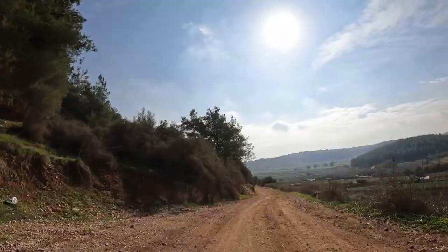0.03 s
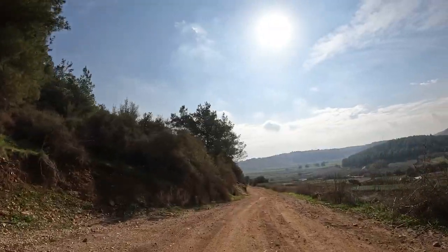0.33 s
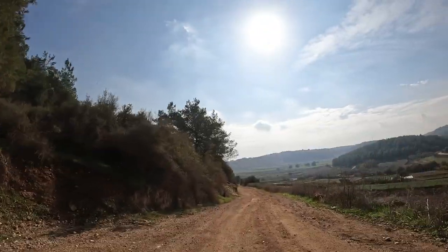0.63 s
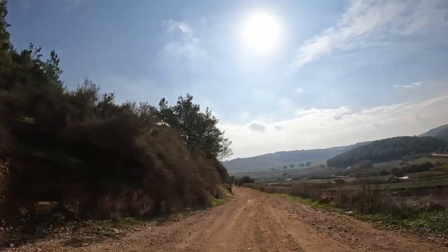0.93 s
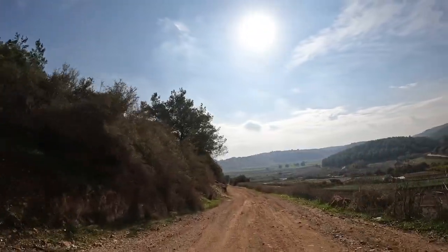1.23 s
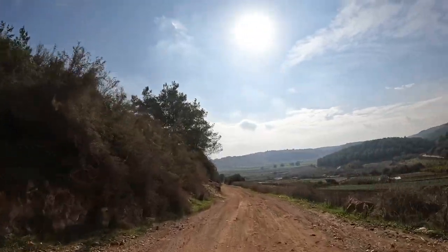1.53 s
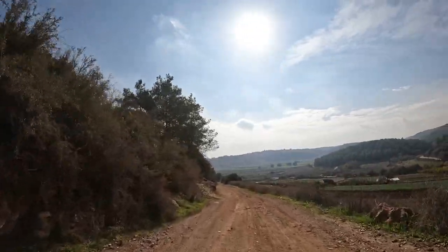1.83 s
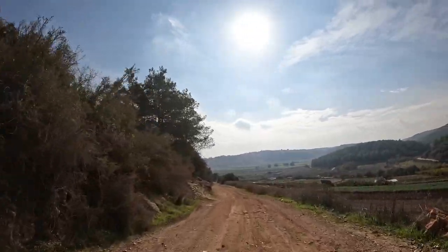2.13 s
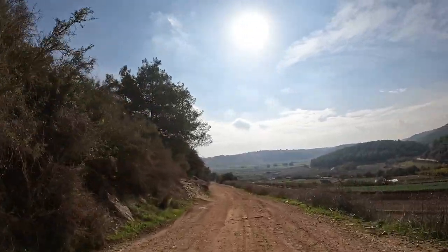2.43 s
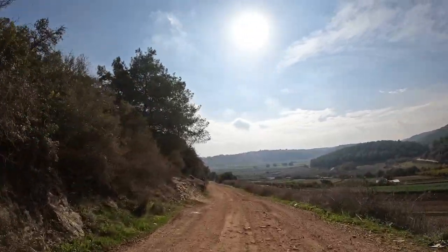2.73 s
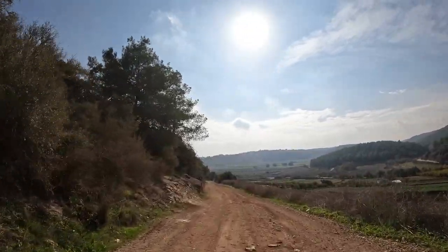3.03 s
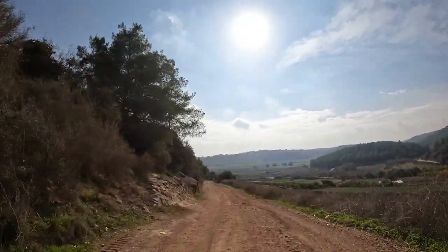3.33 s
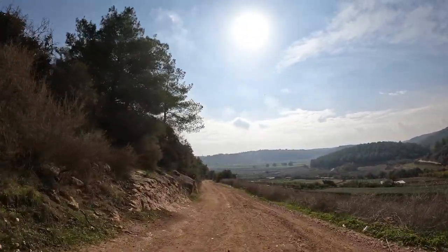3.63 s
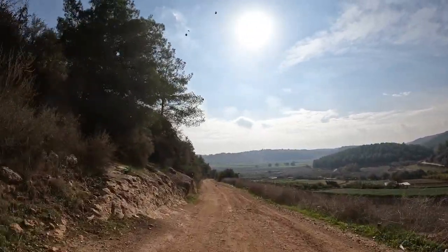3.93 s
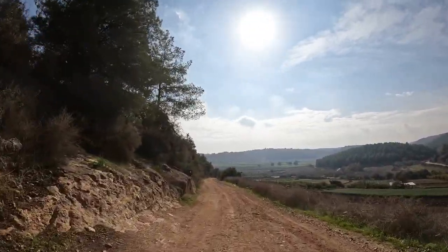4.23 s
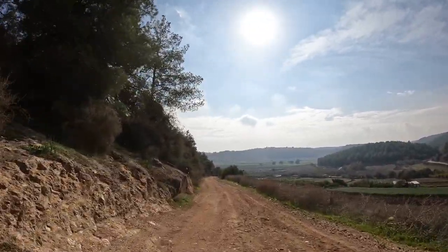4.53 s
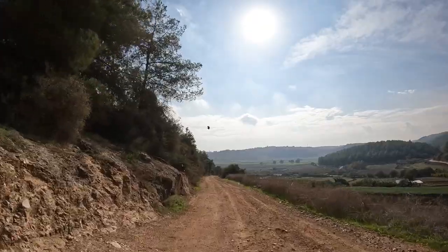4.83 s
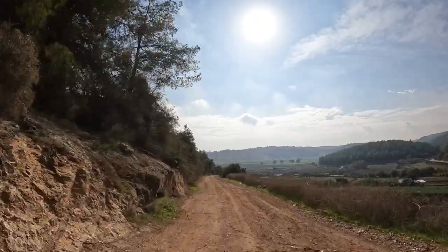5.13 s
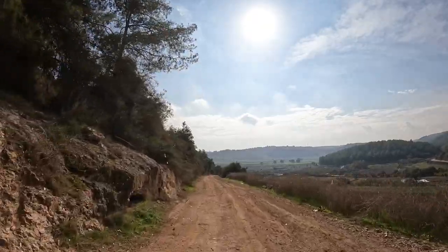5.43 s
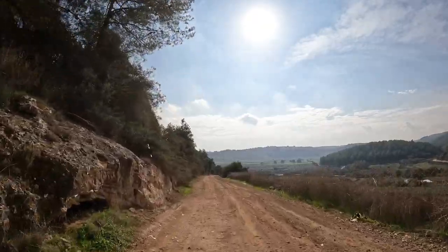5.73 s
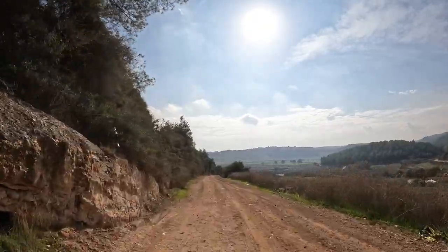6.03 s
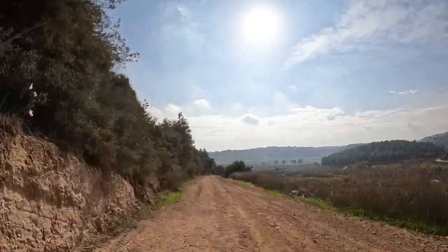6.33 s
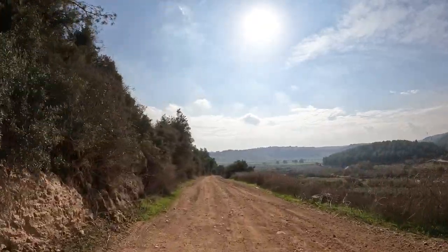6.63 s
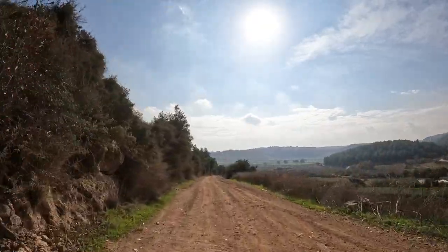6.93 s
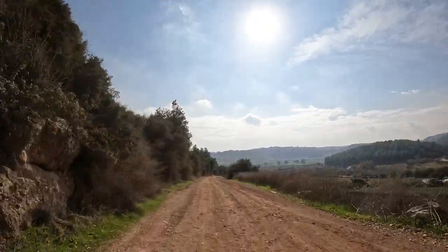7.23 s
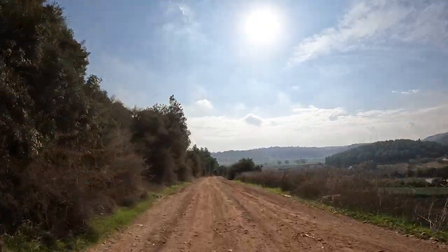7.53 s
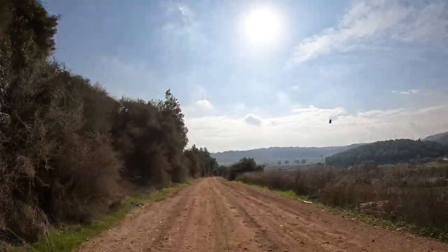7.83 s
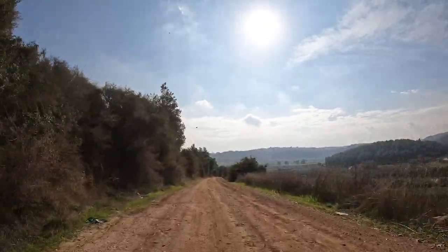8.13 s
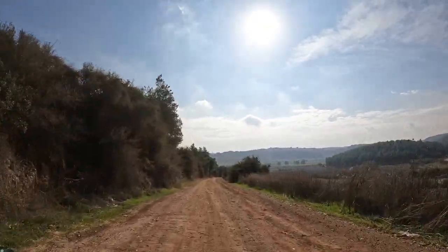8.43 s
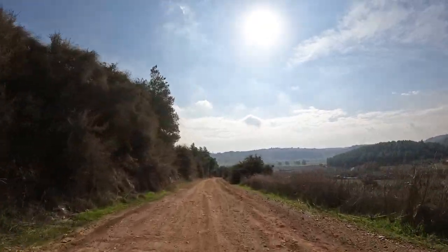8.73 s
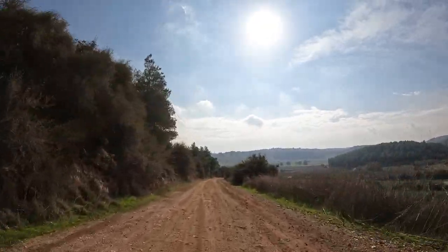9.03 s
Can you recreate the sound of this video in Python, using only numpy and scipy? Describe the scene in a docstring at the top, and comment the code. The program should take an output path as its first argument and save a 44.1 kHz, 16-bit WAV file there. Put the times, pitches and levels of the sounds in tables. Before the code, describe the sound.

Riding over loose gravel in the open, with the microphone mounted on the vehicle and no echo. Steady low rumble and shuddering vibration carry on throughout, with gritty tyre noise and snapping pebbles. Scattered thumps and a couple of faint metal pings come first. Then a dense plastic rattle and heavier knocks build through the middle, thinning into separate clacks and bumps as the ride continues.

```python
"""Riding a stony dirt track

A light vehicle is heard from a small camera fixed to it. Air and road drive the frame into forced
vibration, and the tyres crunch and slip on grit. Impacts excite damped modes: ruts thud the suspension,
bumps thump the frame, and the camera mount clacks against its stop and chatters on rough ground.
Loose stones tick away from the wheels; now and then one rings a thin metal part."""
import sys
import numpy as np
from scipy import signal
from scipy.fft import rfft, irfft
from scipy.io import wavfile
from scipy.ndimage import uniform_filter1d, minimum_filter1d

SR = 44100
rng = np.random.default_rng(int(sys.argv[2]) if len(sys.argv) > 2 else 0)


def dump(signal):
    """Clip the signal to [-1, 1] and save it as 16-bit WAV at the path in sys.argv[1]."""
    limited = np.clip(np.atleast_2d(signal).T, -1, 1)
    pcm = np.round(limited * 32767).astype(np.int16)
    wavfile.write(sys.argv[1], SR, pcm)


N = 404838
TIME = np.arange(N) / SR
HIT_TIME = TIME[:8192]  # time axis of one impact
LEAD_S = .04  # run-up before a contact


def undb(db):
    """Amplitude ratio of a level in decibels."""
    return 10 ** (np.asarray(db) / 20)

def unit(x):
    """Normalisation to an rms of 1."""
    return x / np.sqrt(np.mean(x ** 2))

def curves(table):
    """Linear interpolation of a timed table's columns at every sample."""
    s, *columns = np.transpose(table)
    return [np.interp(TIME, s, column) for column in columns]

def colour(x, points):
    """Spectral shaping through (Hz, dB) points, falling 30 dB per octave beyond both ends."""
    hz, db = np.transpose(points)
    octave = np.log2(np.maximum(np.arange(len(x) // 2 + 1) * SR / len(x), 1))
    beyond = np.abs(octave - np.clip(octave, np.log2(hz[0]), np.log2(hz[-1])))
    gain = undb(np.interp(octave, np.log2(hz), db) - 30 * beyond)
    return irfft(rfft(x) * gain, len(x))

def fade(t60, t=HIT_TIME):
    """Exponential decay by 60 dB in t60 seconds."""
    return np.exp(-np.log(1000) * t / t60)

def add(track, s, sound):
    """Superposition of a sound on a track at s seconds."""
    i = max(int(s * SR), 0)
    track[i:i + len(sound)] += sound[:max(N - i, 0)]

def ring(modes, spread, scatter_db):
    """Modal impulse response of peak 1; pitch and share vary with the point of contact."""
    response = 0
    for hz, db, t60 in modes:
        detune, share = rng.standard_normal(2)
        tone = np.sin(2 * np.pi * hz * (1 + spread * detune) * HIT_TIME)
        response = response + undb(db + scatter_db * share) * fade(t60) * tone
    return response / np.abs(response).max()

def thud(modes, push_s):
    """A gradual push excites the modes without a click."""
    return (1 - np.exp(-(HIT_TIME / push_s) ** 2)) * ring(modes, spread=.05, scatter_db=3)

def grains(per_s, spread_db):
    """Shot noise: random impacts, many small and a few large."""
    size = undb(spread_db * np.minimum(rng.exponential(size=N), 4))
    return unit((rng.random(N) < per_s / SR) * size * rng.standard_normal(N))

def flicker(length, depth_db, span):
    """Log-normal amplitude modulation, smoothed over span samples."""
    return undb(depth_db * unit(uniform_filter1d(rng.standard_normal(length), span)))

def burst(rise_s, t60, tail_db, tail_t60):
    """Transient noise that grows until LEAD_S, then decays with a weak tail."""
    after = np.maximum(HIT_TIME - LEAD_S, 0)
    rise = np.exp(np.minimum(HIT_TIME - LEAD_S, 0) / rise_s)
    decay = fade(t60, after) + undb(tail_db) * fade(tail_t60, after)
    return rise * decay * rng.standard_normal(len(HIT_TIME))

def steady(x, span_s, share):
    """Envelope compression evens out a share of a vibration's slow swells."""
    power = uniform_filter1d(x ** 2, int(span_s * SR))
    return unit(x / (power + 1e-9) ** (share / 2))


# Spectrum of the rumble. Each row: frequency in Hz, relative density in dB.
RUMBLE_SPECTRUM = [(14, -9), (21, -1), (30, 0), (43, -.5), (60, -6.5), (85, -10), (130, -22)]

def rumble():
    """Random forcing by air and suspension gives a deep noise; its slow swells are partly evened out."""
    noise = colour(rng.standard_normal(N), RUMBLE_SPECTRUM)
    return undb(-18.5) * steady(noise, span_s=0.06, share=0.5)

# Stony stretches of track. Each row: start in seconds, length in seconds.
STONY_STRETCHES = [(3.628, 0.12), (4.83, 0.064), (5.117, 0.16), (5.418, 0.14), (5.867, 0.059),
                   (6.403, 0.14), (6.62, 0.17), (7.103, 0.08), (7.515, 0.1), (8.241, 0.084)]

def stony():
    """A soft-edged gate: 1 on a stony stretch, 0 elsewhere."""
    inside = sum(np.clip((TIME - s) / .01, 0, 1) * np.clip((s + length_s - TIME) / .01, 0, 1)
                 for s, length_s in STONY_STRETCHES)
    return uniform_filter1d(inside, size=1200)

# How hard the ground shakes the vehicle. Each row: time in seconds, relative level in dB.
GROUND_SHAKE = [(0.0, -37), (0.3, -37.5), (1.48, -34.5), (1.84, -36), (3.4, -33.5), (3.81, -33),
                (4.24, -36.5), (4.88, -31.5), (5.01, -31.5), (5.67, -30.5), (6.26, -33.5), (6.62, -35),
                (6.77, -32.5), (9.18, -33)]

def shaking_db():
    """Base excitation follows the ground's roughness and rises on stony stretches."""
    return curves(GROUND_SHAKE)[0] + 4.5 * stony()

# Spectrum of the drumming frame. Each row: frequency in Hz, relative density in dB.
DRUMMING_SPECTRUM = [(140, -28.5), (230, 2), (310, 0), (400, 0.5), (470, -8.5), (560, -15.5), (700, -23.5),
                     (810, -19.5), (1000, -32), (1500, -37)]

def drumming():
    """Forced vibration: dense small bumps are filtered by the frame's response."""
    response = colour(grains(per_s=1300, spread_db=2), DRUMMING_SPECTRUM)
    return steady(response, span_s=0.38, share=0.089) * undb(shaking_db() + 0.5)

# The suspension heaves over dips. Each row: start in seconds, length in seconds, shudder change in dB.
DIP_HEAVES = [(0.087, 0.21, 5), (0.501, 0.17, 11.5), (0.727, 0.11, 11), (1.04, 0.45, 5.5),
              (2.68, .16, -1.5), (3.08, 0.22, 2.5), (3.76, 0.2, 1), (4.853, 0.48, 3), (5.45, 0.17, 7.5),
              (7.35, 0.35, 4), (8.26, 0.38, 6.5)]
# Spectrum of the shuddering frame. Each row: frequency in Hz, relative density in dB.
SHUDDER_SPECTRUM = [(55, -28), (85, -9), (115, 2.5), (155, -6), (205, -6), (270, -33), (400, -52.5)]

def shudder():
    """Low frame vibration, amplitude-modulated by rough ground, heaves and random surges."""
    level_db = -31.5 + 0.47 * (shaking_db() + 36)  # -36 dB is the usual shaking
    for s, length_s, db in DIP_HEAVES:
        add(level_db, s, db * np.hanning(int(length_s * SR)))
    surge_db = 1.7 * unit(colour(rng.standard_normal(N), [(3, 0), (9, 0)]))
    noise = colour(rng.standard_normal(N), SHUDDER_SPECTRUM)
    return steady(noise, span_s=0.64, share=0.15) * undb(level_db + surge_db)

def grit_noise(spectrum, patchy_db, span):
    """Granular friction: neighbouring grains slip together in clusters about span samples long."""
    clusters = flicker(N, patchy_db, span)
    grit = unit(grains(per_s=5000, spread_db=1.5) + 1.9 * rng.standard_normal(N))
    return unit(colour(grit * clusters, spectrum))

# Loose cover on the track. Each row: time in seconds, relative crunch and sand levels in dB.
LOOSE_COVER = [(0.0, -46.5, -65), (0.54, -53, -68.5), (0.74, -49, -61), (1.76, -51, -63.5),
               (1.94, -54.5, -66), (2.48, -54, -65.5), (2.71, -51, -59.5), (3.35, -50, -63),
               (3.81, -47.5, -57.5), (4.01, -52.5, -64.5), (4.19, -52, -67.5), (4.91, -47.5, -57),
               (5.03, -50.5, -59), (5.78, -47.5, -58), (6.14, -48, -59.5), (6.59, -53.5, -61.5),
               (6.88, -51, -66), (7.31, -50.5, -59.5), (7.8, -48.5, -60.5), (8.05, -48.5, -58.5),
               (8.36, -46, -56.5), (8.59, -51, -64), (8.7, -54.5, -65), (8.85, -47.5, -62),
               (9.18, -52.5, -59.5)]
# Spectra of crushed grit and of fine sand. Each row: frequency in Hz, relative density in dB.
CRUNCH_SPECTRUM = [(400, 13), (800, 11), (1200, 8), (1450, 5.5), (1700, 5), (2150, -1.5), (2900, -1),
                   (3700, -4), (5000, -18)]
SAND_SPECTRUM = [(2000, -14.5), (3600, -6.5), (5000, 0.5), (6300, -3.5), (6900, -14.5), (8200, -14),
                 (9200, -22), (11000, -17.5), (13500, -45.5)]

def tyres():
    """Countless tiny contacts under the tread sum to a soft crunch and a hiss of sand."""
    crunch_db, sand_db = curves(LOOSE_COVER)
    crunch = grit_noise(CRUNCH_SPECTRUM, patchy_db=3, span=900) * undb(crunch_db + 2.1)
    sand = grit_noise(SAND_SPECTRUM, patchy_db=-0.5, span=2600) * undb(sand_db - 3.2)
    return (crunch + sand) * undb(5 * stony())

# Spectrum of cracking chips. Each row: frequency in Hz, relative density in dB.
CHIP_SPECTRUM = [(800, -6), (1500, 1.5), (2700, 5), (3600, -9.5), (5500, -11), (7000, -23)]

def chips():
    """Brittle fracture: single chips crack under the tread, louder where the cover is loose."""
    fractures = grains(per_s=70, spread_db=2)
    crack = fade(.014) * rng.standard_normal(len(HIT_TIME))
    cracks = signal.fftconvolve(fractures, crack)[:N]
    return unit(colour(cracks, CHIP_SPECTRUM)) * undb(curves(LOOSE_COVER)[0] - 12.5)

# A tyre slips on grit. Each row: start in seconds, length in seconds, level at the crest in dB,
# centre frequency in Hz, half-width in octaves.
TYRE_SLIPS = [(0, 0.45, -50.5, 1110, 0.83), (0.047, 0.031, -47, 3530, 0.33),
              (0.157, 0.011, -41, 2350, 0.37), (0.305, 0.013, -46, 1990, 0.44),
              (0.498, 0.25, -47, 1660, 1.65), (0.573, 0.046, -46, 2300, 0.72),
              (0.657, 0.28, -51.5, 2200, 1.4), (2.475, 0.29, -48.5, 1560, 0.42),
              (2.509, 0.011, -44, 2040, 0.44), (3.184, 0.026, -45.5, 2810, 0.93),
              (4.478, 0.31, -54, 1570, 0.3)]

def slips():
    """Sliding friction rubs a swelling band of noise out of the grit."""
    out = np.zeros(N)
    for s, length_s, db, hz, octaves in TYRE_SLIPS:
        swell = np.hanning(int(length_s * SR))
        band = [(hz / 2 ** octaves, -15), (hz, 0), (hz * 2 ** octaves, -15)]
        rub = unit(colour(rng.standard_normal(len(swell)), band))
        add(out, s, undb(db) * rub * swell)
    return out

# A wheel drops into a rut. Each row: start in seconds, relative level in dB.
RUT_DROPS = [(0.108, -20), (0.188, -21), (0.562, -15), (1.087, -19), (1.159, -12), (1.269, -25),
             (1.485, -15), (2.144, -13.5), (3.143, -20), (3.299, -16.5), (3.399, -21), (3.563, -16.5),
             (4.822, -21), (5.07, -14), (5.281, -13.5), (6.077, -12.5), (6.401, -13), (6.565, -8),
             (7.109, -15), (7.397, -24), (7.542, -16.5), (7.894, -17), (8.463, -16.5)]
# Modes of the suspension. Each row: frequency in Hz, relative level in dB, t60 in seconds.
SUSPENSION_MODES = [(96.3, -7.5, 0.14), (120, -1.5, 0.1), (148.6, -10.5, 0.064)]

def ruts():
    """Damped free vibration of the suspension gives a soft, deep thud at each rut."""
    out = np.zeros(N)
    for s, db in RUT_DROPS:
        add(out, s, undb(db + 9) * thud(SUSPENSION_MODES, push_s=0.0063))
    return out

def stray_pebbles(count):
    """Random scatter of small stones, louder on loose cover, as rows like those of PINCHED_STONES."""
    jitter, brightness = rng.random((2, count))
    s = (np.arange(count) + jitter) / count * TIME[-1]
    sand_db = np.interp(s, TIME, curves(LOOSE_COVER)[1])
    db = sand_db + 5 + 2.5 * rng.standard_normal(count)
    return list(zip(s, db, 3500 + 2000 * brightness, np.full(count, 0.07)))

# Stones squirt from under a tyre. Each row: time in seconds, relative level in dB,
# emphasised frequency in Hz, t60 in seconds.
PINCHED_STONES = [(0.2323, -41.5, 3000, 0.036), (1.1009, -48.5, 4860, 0.037), (1.3563, -46.5, 5210, 0.037),
                  (1.462, -53, 4930, 0.035), (1.642, -41.5, 3670, 0.071), (1.7497, -47, 3610, 0.031),
                  (1.8462, -35, 5440, 0.043), (2.3446, -49.5, 3440, 0.018), (2.5571, -46, 5140, 0.12),
                  (2.61, -44.5, 5250, 0.18), (2.74, -47.5, 5800, 0.13), (2.7653, -45.5, 5240, 0.063),
                  (2.995, -50, 5000, 0.036), (3.104, -45.5, 4790, 0.058), (3.4296, -42, 4500, 0.068),
                  (3.5517, -47, 3720, 0.077), (3.71, -43, 4000, 0.2), (3.915, -48, 4200, 0.08),
                  (4.244, -48, 4200, 0.06), (4.4362, -43.5, 3370, 0.13), (4.5166, -44.5, 3300, 0.1),
                  (4.612, -42, 4000, 0.11), (4.914, -45, 4000, 0.046), (5.002, -44, 4000, 0.043),
                  (5.0823, -39.5, 4900, 0.079), (5.108, -39.5, 3510, 0.052), (5.163, -42, 3320, 0.038),
                  (5.21, -40, 3600, 0.035), (5.348, -41, 4360, .05), (5.435, -46, 4000, 0.085),
                  (5.671, -41, 3460, 0.048), (5.7318, -40, 4780, 0.1), (5.811, -42.5, 4600, 0.11),
                  (6.883, -44.5, 3500, 0.086), (7.073, -47, 3470, .07), (7.119, -44.5, 3350, 0.16),
                  (7.1687, -43.5, 3670, 0.045), (7.224, -48, 4500, .05), (7.53, -46, 4000, 0.057),
                  (7.808, -45, 4790, 0.077), (7.9316, -46, 3310, 0.035), (8.4972, -43.5, 3620, 0.04),
                  (8.808, -46.5, 3400, 0.042), (8.932, -46, 4500, .025)]
# Filter common to all sprays of stones. Each row: frequency in Hz, gain in dB.
SPRAY_SPECTRUM = [(1800, 3.5), (3600, 1), (4200, -2), (5200, 0), (6200, -3.5), (6900, -11.5), (8000, -12),
                  (9200, -19.5), (10800, -15.5), (12500, -27), (14000, -36)]

def stones():
    """Sudden release: pinched stones snap away in a grainy spray, each with its own brightness."""
    sprays = np.zeros(N)
    for s, db, hz, t60 in list(PINCHED_STONES) + stray_pebbles(count=30):
        graininess = flicker(len(HIT_TIME), depth_db=2.7, span=70)
        spray = graininess * burst(rise_s=min(t60 / 6.5, .013), t60=t60, tail_db=-12, tail_t60=.16)
        band = [(hz / 4, -10), (hz, 0), (hz * 4, -3)]
        add(sprays, s + 0.0014 - LEAD_S, undb(db + 4.5) * colour(spray, band))
    return colour(sprays, SPRAY_SPECTRUM)

# A wheel strikes a bump. Each row: time in seconds, relative level in dB, favoured frequency in Hz.
BUMP_STRIKES = [(0.549, -28.5, 205), (0.619, -19.5, 215), (1.644, -15.5, 266), (3.515, -19, 372),
                (3.904, -12, 301), (4.425, -12.5, 230), (4.451, -13, 283), (4.964, -25, 277),
                (5.04, -14, 237), (5.206, -15, 277), (5.564, -10.5, 316), (5.825, -14.5, 215),
                (5.871, -15.5, 232.8), (5.924, -13, 210), (6.064, -14.5, 312), (6.317, -26, 266),
                (6.563, -15, 194), (6.63, -20, 400), (7.087, -14.5, 215), (7.45, -17, 201),
                (7.54, -16, 205), (7.579, -18.5, 264), (7.652, -16, 345), (8.278, -16, 290),
                (8.295, -16, 200), (8.46, -24, 200), (8.529, -16.5, 256), (8.891, -15, 202)]
# Modes of the frame. Each row: frequency in Hz, relative level in dB, t60 in seconds.
FRAME_MODES = [(119, -5, 0.14), (163, -22.5, 0.016), (216.8, -4, 0.13), (281, 7.5, 0.052),
               (330.7, -3.5, 0.08), (388, -5.5, 0.12), (430, -33, 0.015)]

def bumps():
    """Tyre compliance cushions each thump, which stresses frame modes near its favoured frequency."""
    out = np.zeros(N)
    for s, db, favoured_hz in BUMP_STRIKES:
        modes = [(hz, mode_db - 8 * abs(np.log2(hz / favoured_hz)), t60)
                 for hz, mode_db, t60 in FRAME_MODES]
        add(out, s - .002, undb(db + 9.5) * thud(modes, push_s=0.0029))
    return out

def blow(x, db):
    """Energy normalisation: a hit carries as much as 10 ms of sound at an rms level of db."""
    return x * undb(db) * np.sqrt(.01 * SR / np.sum(x ** 2))

def muffle(x):
    """Low-pass response: soft plastic radiates little above its highest mode."""
    return signal.sosfilt(signal.butter(4, 4500, fs=SR, output="sos"), x)

def struck(modes, contact_t60, chafe_db):
    """Convolution of plastic modes with a rough contact whose faces chafe just before and after."""
    contact = burst(rise_s=.0009, t60=contact_t60, tail_db=-30, tail_t60=.045)
    contact[int(LEAD_S * SR)] += 5  # the firm touch at its centre
    chafe = undb(chafe_db) * burst(rise_s=.004, t60=.03, tail_db=-14, tail_t60=.09)
    response = ring(modes, spread=.015, scatter_db=2)
    return muffle(signal.fftconvolve(contact + chafe, response)[:len(HIT_TIME)])

# The mount hits its stop, singly or in runs. Each row: time in seconds, then relative levels in dB
# of the frame's thud, the body's knock, the mount's ring and the bright edge.
MOUNT_HITS = [(0.9172, -20.5, -40, -45, -57.5), (1.1838, -24, -41, -49, -60),
              (1.6487, -21.5, -36, -37.5, -53), (1.6608, -17, -33.5, -41.5, -45),
              (2.5591, -25, -36.5, -37, -52), (2.6032, -25, -49, -42, -47.0), (2.616, -24, -36.5, -52, -55),
              (3.5174, -25, -38, -52, -57.5), (3.6541, -17, -33, -41, -45),
              (3.6729, -28, -31.5, -34.5, -50.5), (3.6928, -29.0, -38, -33.5, -52.0),
              (3.7154, -23.0, -37, -35, -51), (3.7284, -17.5, -32, -45.5, -51.5),
              (3.7435, -17.5, -37.5, -30.5, -47), (3.768, -20.5, -34, -33, -47),
              (3.778, -21, -43, -49, -57.0), (3.851, -27.5, -36.5, -46, -52),
              (3.9054, -21, -37.5, -44, -54), (3.926, -22.5, -41, -28.5, -43.5),
              (3.9955, -28, -37.5, -35, -52), (4.0197, -30, -49, -39, -55), (4.252, -23.5, -40, -35, -56),
              (4.452, -15, -39.5, -33.5, -48), (4.608, -20.5, -36, -37, -50), (4.625, -36, -32, -28.5, -45),
              (4.6366, -32, -38, -56, -59.5), (4.8082, -35, -44, -32, -51), (4.818, -22, -44.0, -50, -63.0),
              (4.859, -22, -30, -41, -46), (4.8735, -31.0, -36.5, -41, -57), (4.8853, -20, -41, -56, -60),
              (4.9178, -18.5, -39.5, -39, -59), (4.9347, -24, -36, -45, -60), (4.968, -22, -41.0, -42, -51),
              (5.0084, -28, -43, -32.5, -50.5), (5.0212, -18, -37, -40, -55.5),
              (5.063, -38, -33.5, -32, -53), (5.1109, -17.5, -33, -34, -52),
              (5.1249, -24.0, -35, -47.0, -55), (5.1554, -28, -37, -33.5, -43),
              (5.1646, -18.0, -30.5, -47, -47.5), (5.1802, -21, -33.5, -37, -48.0),
              (5.2, -19, -32, -35, -50.0), (5.2181, -21, -37, -51, -52), (5.234, -25, -32, -38, -61.0),
              (5.251, -21, -39.0, -49, -61.5), (5.3008, -17, -31, -26, -43.5),
              (5.3693, -24, -39, -42, -59.5), (5.4249, -19.5, -37.5, -37, -56),
              (5.4397, -18.5, -37, -36, -53), (5.4496, -40, -48, -45.0, -57.5),
              (5.4598, -17, -44, -26, -44), (5.4685, -31, -43.5, -56, -63.5),
              (5.4824, -28, -46, -28, -42.5), (5.5, -18, -42, -38, -65), (5.51, -21.5, -40, -48, -61.5),
              (5.5443, -22.0, -38, -51.5, -56.5), (5.5572, -19.5, -38, -35, -50),
              (5.5718, -21, -33, -48.5, -57.0), (5.6078, -18.5, -35, -42, -54),
              (5.6253, -16.5, -34, -38, -59.0), (5.6898, -35, -39, -41.5, -63.5),
              (5.6997, -22, -48, -50, -66), (5.7596, -23.5, -40, -30.5, -51), (5.7742, -23, -46, -48, -61),
              (5.8434, -27, -36, -38.5, -63.5), (5.8708, -24, -48, -45, -62.5),
              (5.8912, -38, -43, -42, -57), (5.9366, -24, -38.5, -39.5, -49.5),
              (6.0817, -25.5, -31, -41, -48), (6.1018, -22.5, -36, -33, -48),
              (6.3187, -22.5, -44, -49, -74), (6.3869, -22, -42, -32.5, -51), (6.4008, -18, -36, -43, -51),
              (6.4428, -22.5, -30.5, -36.5, -49), (6.467, -22.5, -38.5, -34, -56),
              (6.481, -18, -36.5, -48, -53.5), (6.5019, -33, -38, -43, -51), (6.562, -31, -43.5, -50, -62),
              (6.5822, -28.5, -46.5, -41, -52), (6.641, -21.5, -36.5, -43, -53),
              (6.661, -42, -38, -39, -65), (6.7068, -33, -49, -45.0, -54.0), (6.7174, -22.5, -41, -43, -51),
              (6.733, -28, -36, -47, -58.5), (6.8682, -18, -45, -57, -60), (6.881, -25.5, -30, -36.5, -47),
              (6.896, -31, -35, -43, -56), (7.0406, -21, -39, -44, -54), (7.0753, -32, -42.0, -37, -53.0),
              (7.0909, -23, -38, -51, -56), (7.1255, -17, -32.5, -44, -54), (7.1422, -23, -40, -46.5, -54),
              (7.1583, -43, -48, -49.5, -60), (7.29, -19, -40, -42, -51), (7.451, -22.5, -40, -44, -53),
              (7.493, -39.0, -44, -30, -48), (7.5393, -23.5, -41.0, -45, -54.0),
              (7.5614, -28, -37, -36, -50), (7.94, -32, -46, -40.5, -56.5), (8.0473, -44, -45, -43.5, -55),
              (8.1007, -20.5, -49, -48, -51), (8.2486, -19, -39.5, -37, -58), (8.2768, -18, -43, -42, -59),
              (8.2933, -21, -36, -42, -60), (8.339, -22, -48.5, -46, -63), (8.3488, -17, -40, -28, -44),
              (8.3719, -40.5, -42.0, -43, -64.0), (8.3966, -20, -36.5, -33.5, -50),
              (8.4635, -27.5, -43, -49, -66), (8.5298, -21.5, -39, -44, -52.5),
              (8.5703, -36, -47, -36.5, -55), (8.7767, -17.5, -40.0, -36, -49.5),
              (8.8204, -23.5, -48, -46, -57)]
# Modes of the hollow body and the mount. Each row: frequency in Hz, relative level in dB, t60 in seconds.
BODY_MODES = [(487, -1, 0.04), (593, -2.5, 0.045), (831, 0.5, 0.037), (1055, -1.5, 0.011),
              (1393, -1.5, 0.013), (1768, 3, .016), (2260, -6, 0.0065)]
MOUNT_MODES = [(1770, -9, 0.03), (2300, -11.5, 0.0023), (2890, 3, 0.021), (2962, 7.5, 0.014),
               (3240, -2, 0.015), (3650, -19.5, 0.0023)]
# Spectrum of a clack's bright edge. Each row: frequency in Hz, relative density in dB.
EDGE_SPECTRUM = [(3000, -5), (3600, -1.5), (4200, -10.5), (5200, 1), (6100, 3.5), (7000, -12.5),
                 (8200, -13.5), (9200, -27.5), (11000, -30.5), (13000, -51)]

def clacks():
    """An impact of plastic on plastic excites frame, body and mount together, with a bright snap."""
    out = np.zeros(N)
    # pressed against the stop, the frame rings for less than its free time
    damped = [(hz, db, t60 * 0.86) for hz, db, t60 in FRAME_MODES]
    for s, thud_db, knock_db, ring_db, edge_db in MOUNT_HITS:
        add(out, s - .002, blow(thud(damped, push_s=0.0015), thud_db))
        knock = struck(BODY_MODES, contact_t60=0.0034, chafe_db=-10)
        add(out, s - .0007 - LEAD_S, blow(knock, knock_db + 2))
        ringing = struck(MOUNT_MODES, contact_t60=0.0046, chafe_db=-13.5)
        add(out, s - .0005 - LEAD_S, blow(ringing, ring_db - 0.5))
        snap = burst(rise_s=.001, t60=.007, tail_db=-17, tail_t60=.04)
        add(out, s - .0004 - LEAD_S, blow(colour(snap, EDGE_SPECTRUM), edge_db - 3))
    return out

# Partials of thin metal hit by a stone. Each row: start in seconds, peak level in dB,
# frequency in Hz, t60 in seconds, gain of the jingle in dB.
METAL_PARTIALS = [(1.846, -42, 5400, .06, -47), (3.429, -44.5, 4620, .11, -47),
                  (3.427, -47, 4380, .06, -52), (3.429, -47, 3740, .07, -54), (3.43, -65, 7800, .2, -62),
                  (3.538, -55, 8963, .2, -51), (3.516, -69, 9437, .1, -49)]

def metal_pings():
    """Resonance of thin metal: each partial is a damped sine within a band of jingling noise."""
    out = np.zeros(N)
    for s, db, hz, t60, jingle_db in METAL_PARTIALS:
        tone = fade(t60) * np.sin(2 * np.pi * hz * HIT_TIME)
        noise = fade(t60) * rng.standard_normal(len(HIT_TIME))
        jingle = colour(noise, [(hz / 1.4, -14), (hz, 0), (hz * 1.3, -14)])
        add(out, s, undb(db) * tone + undb(jingle_db) * jingle)
    return out

def chatter(threshold_db=-33.5):
    """Contact rattle: mount and body tap at several points, but only on rough or stony ground."""
    drive = np.maximum(curves(GROUND_SHAKE)[0] - threshold_db, 0) + 2.2 * stony() + 1e-6
    out = np.zeros(N)
    for modes in (MOUNT_MODES, BODY_MODES) * 2:
        taps = grains(per_s=600, spread_db=1.5) * drive
        response = ring(modes, spread=.04, scatter_db=.5)
        out += unit(signal.oaconvolve(taps, response)[:N])
    return undb(-56) * unit(muffle(out))

def scene():
    """Free-field superposition: every source rides with the microphone, without echoes."""
    rolling = rumble() + drumming() + shudder() + tyres() + chips() + slips()
    impacts = ruts() + stones() + bumps() + clacks() + metal_pings() + chatter()
    return (rolling + impacts)[None]

def record(dry):
    """Peak limiting holds down the biggest jolts; a low-pass filter cuts the highest treble."""
    ceiling, top_hz = undb(-5.8), 14500
    gain = minimum_filter1d(ceiling / np.maximum(np.abs(dry), ceiling), size=400)
    limited = dry * uniform_filter1d(gain, size=400)
    return signal.sosfilt(signal.ellip(8, .2, 70, top_hz, fs=SR, output="sos"), limited)


dry = scene()
out = record(dry)
dump(out)
```